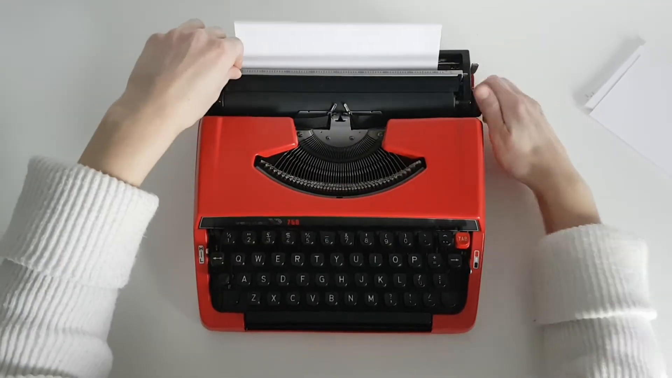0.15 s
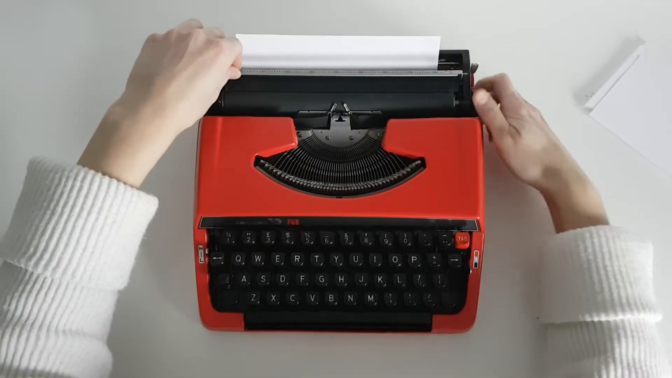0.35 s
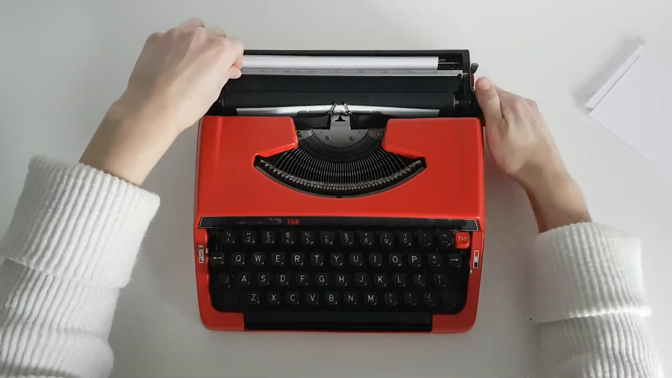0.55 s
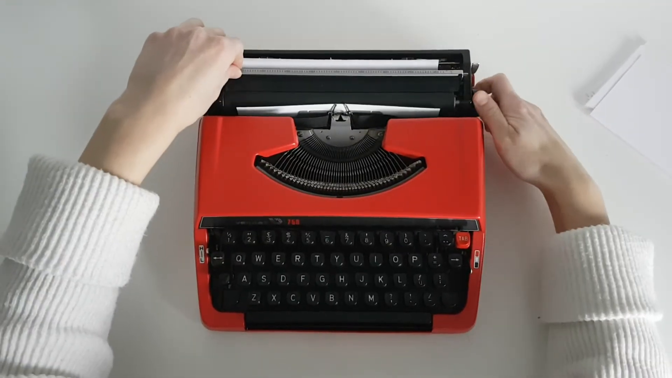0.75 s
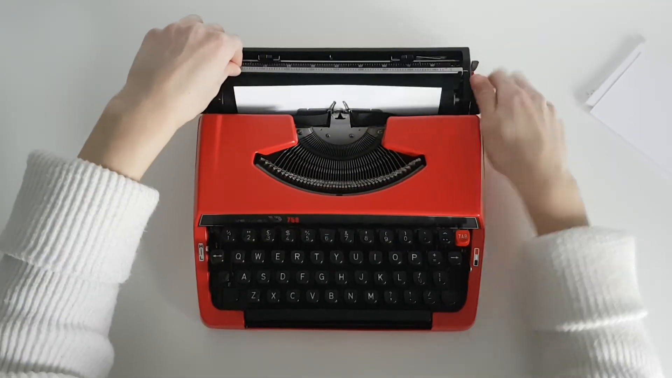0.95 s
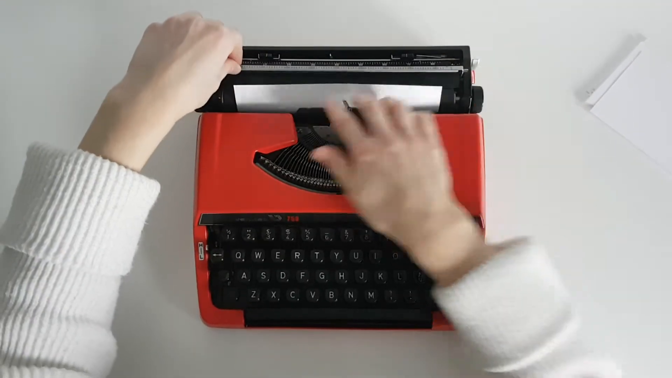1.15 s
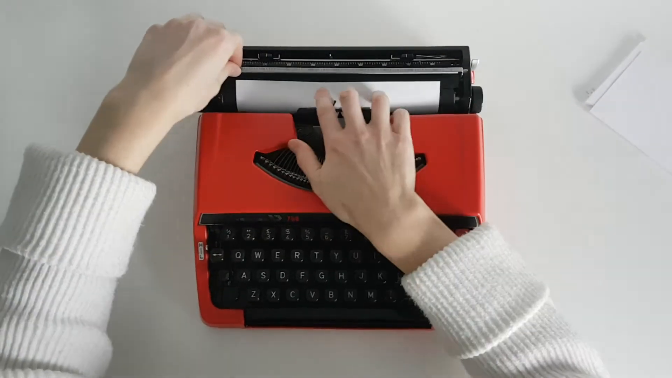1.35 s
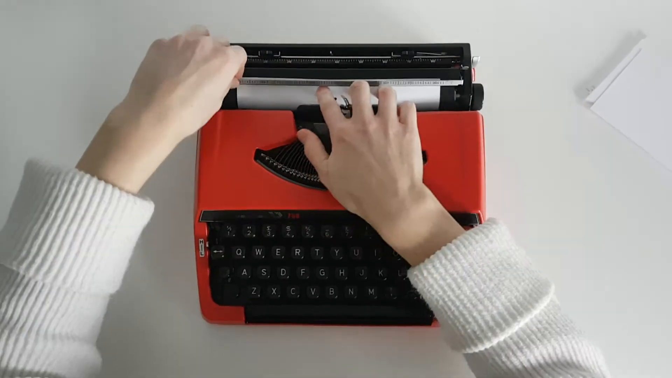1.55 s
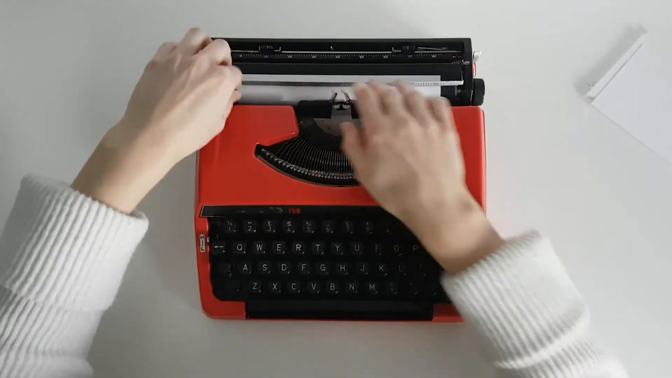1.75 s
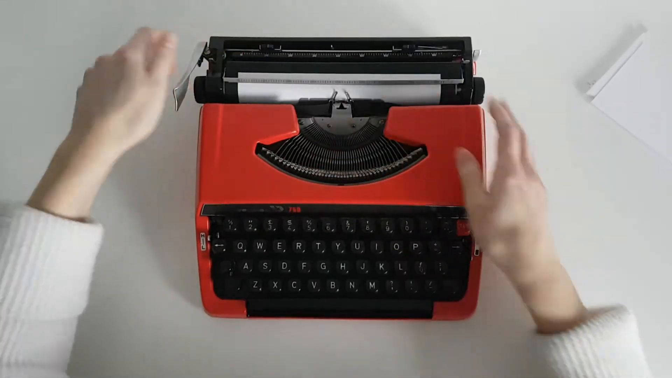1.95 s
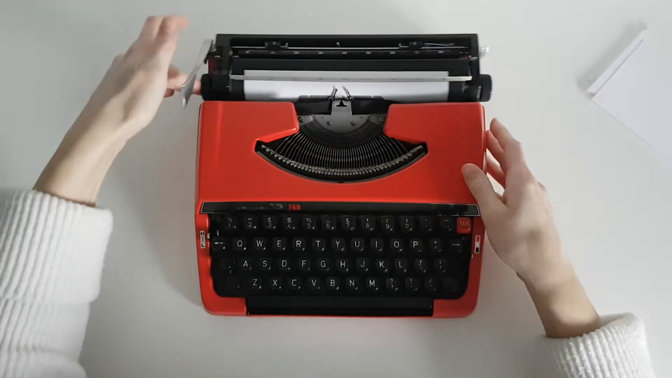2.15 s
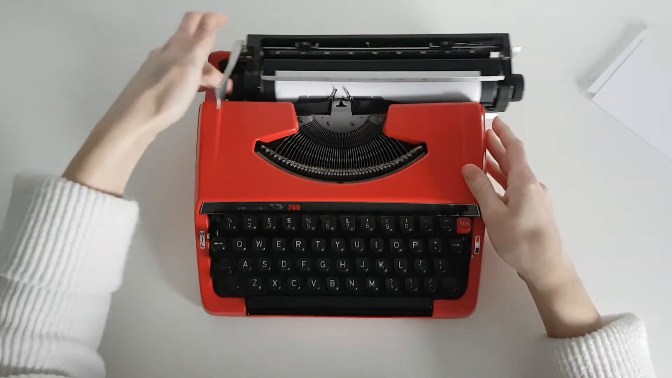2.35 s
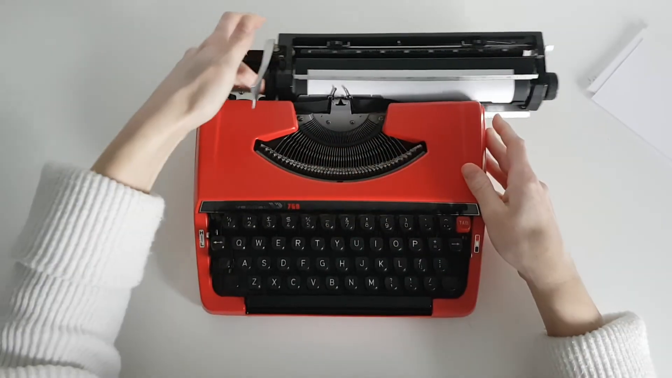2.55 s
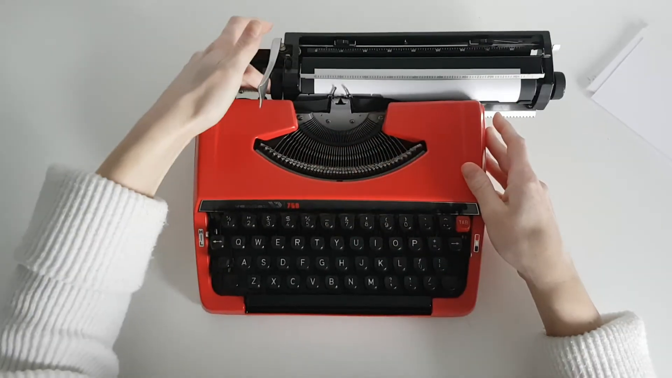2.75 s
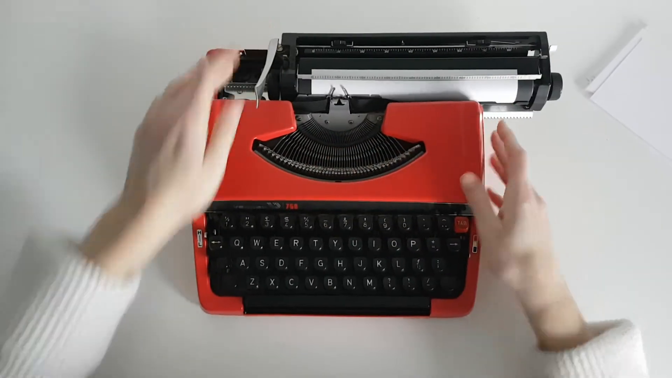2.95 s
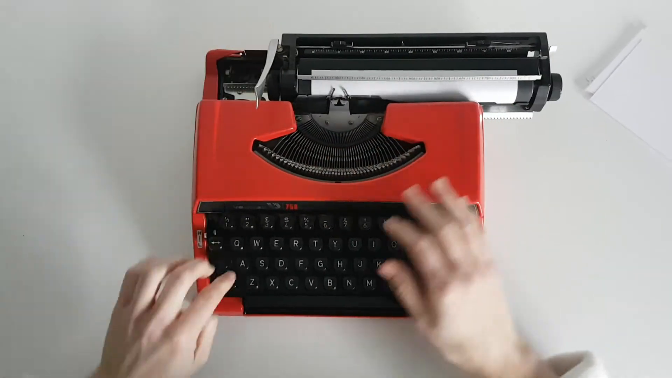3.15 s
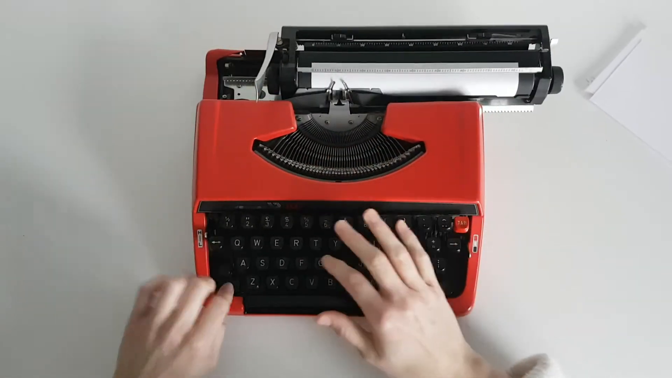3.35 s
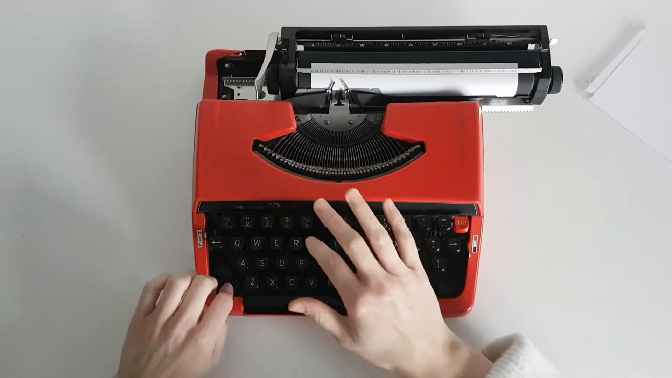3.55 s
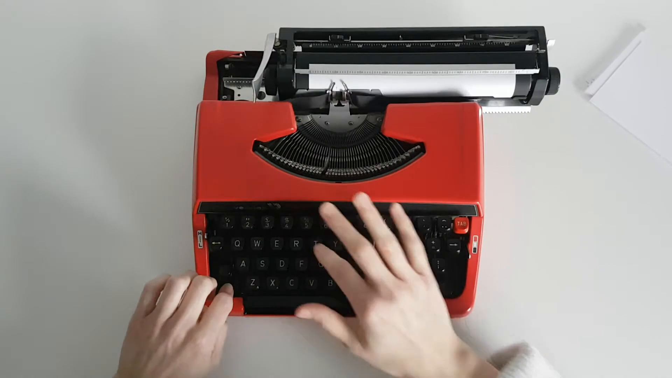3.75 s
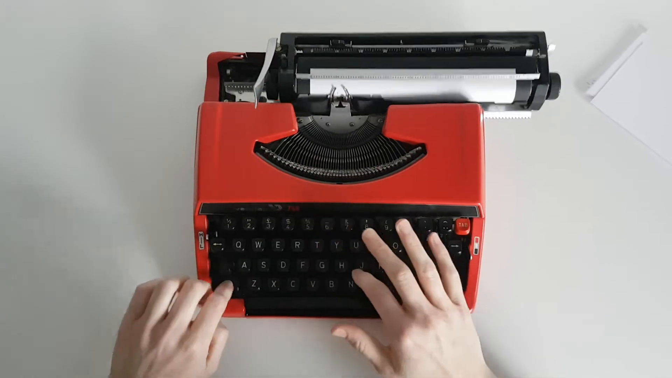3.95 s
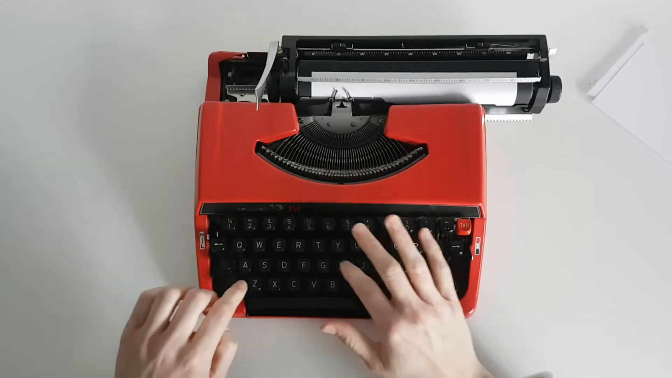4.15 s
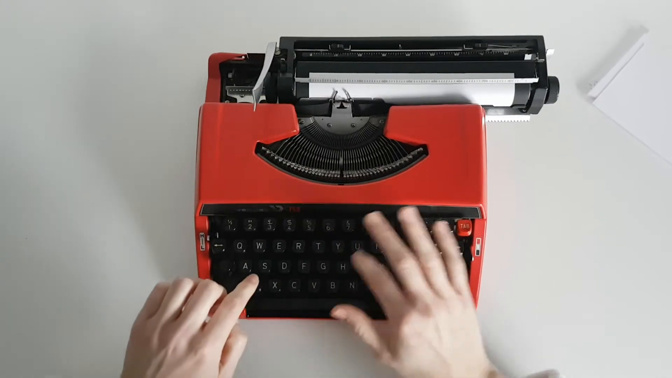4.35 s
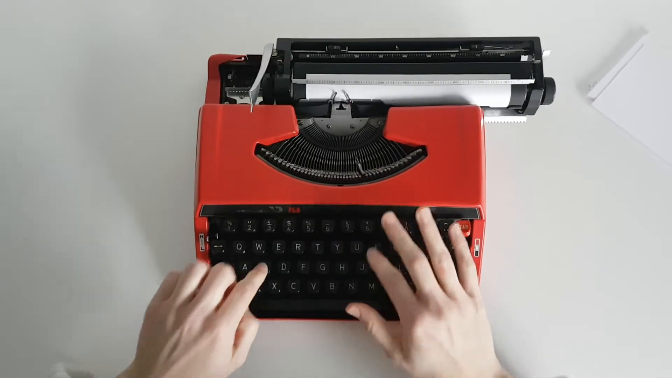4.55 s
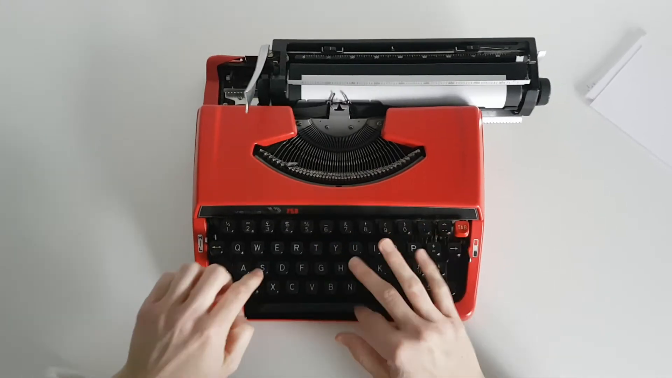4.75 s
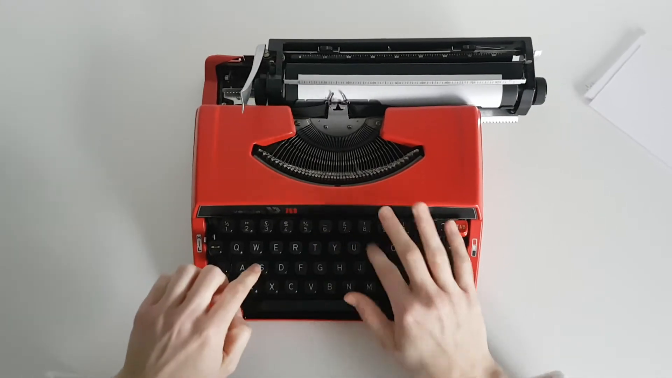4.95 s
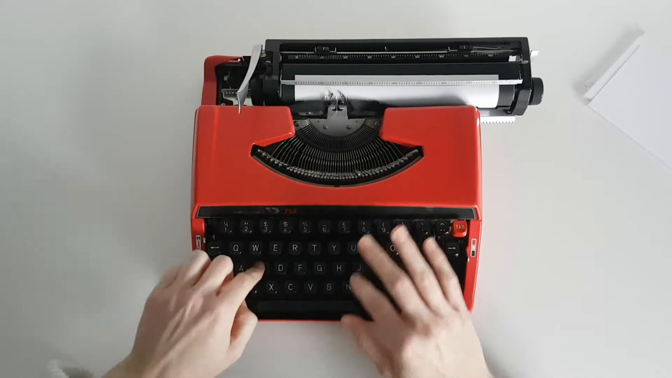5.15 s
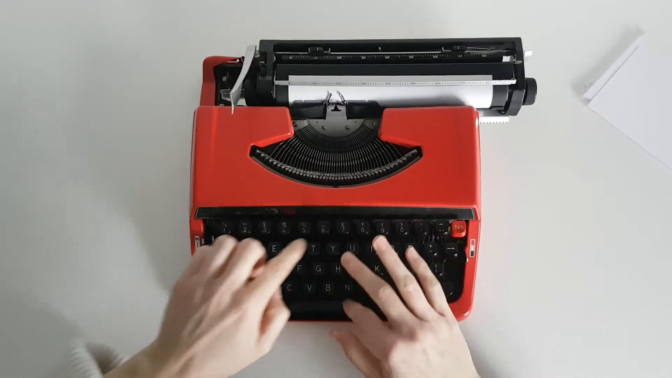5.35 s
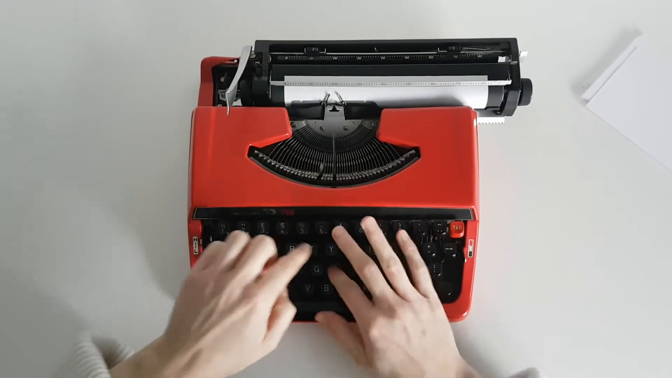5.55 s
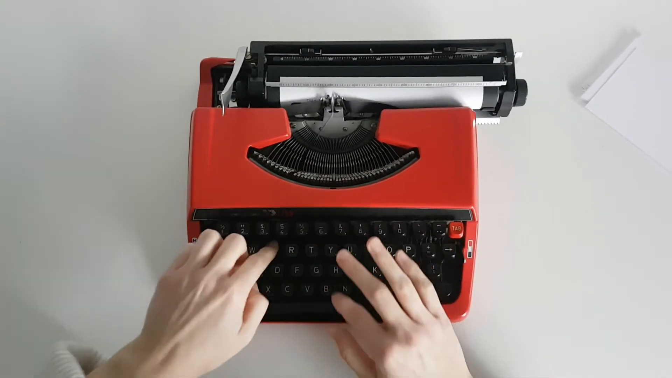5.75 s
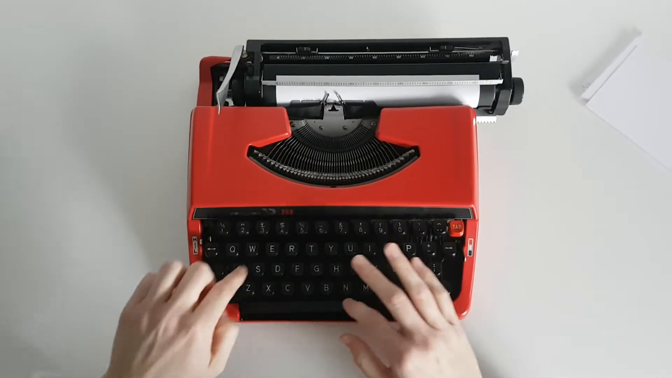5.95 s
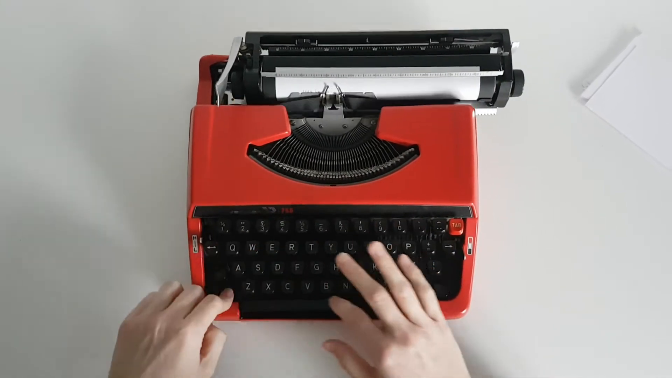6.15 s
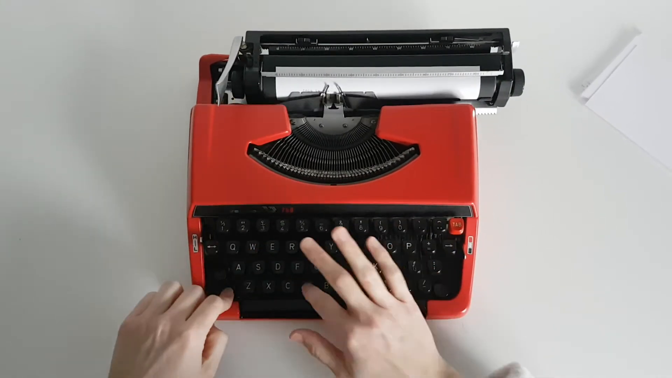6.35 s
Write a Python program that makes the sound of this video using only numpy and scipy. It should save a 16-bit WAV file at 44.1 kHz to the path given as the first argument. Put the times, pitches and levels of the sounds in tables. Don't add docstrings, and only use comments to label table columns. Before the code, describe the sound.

Close stereo microphones above a manual typewriter on a desk, in a quiet room with low hiss. From 0 to 1 second, four short bursts of dry ratchet chatter, at about 0, 0.15, 0.5 and 0.85, wind in scraping paper, with small clicks between. From 1 to 2 there are sparse, light finger and lever ticks and soft desk bumps. Around 2.15 to 2.65 the carriage rolls faintly with a thin whirr, ending in a sharp click; a short push follows near 2.9. At 3.4 a loud shift clack rings the cover and rocks to rest. Light key clatter and a carriage step follow at 3.7, then a double dropping thud at 4.0. Hard, bright typebar slaps land at 4.27, 4.49, 4.64, 5.02, 5.18, 5.48, 5.61 and 5.74, interleaved with metallic steps and falling-key rattle. Another shift clunks at 6.16; a final slap lands at 6.43.

```python
import sys
import numpy as np
from scipy import signal
from scipy.io import wavfile
from scipy.ndimage import uniform_filter1d

SR = 44100
rng = np.random.default_rng(int(sys.argv[2]) if len(sys.argv) > 2 else 0)


def output_pcm(signal):
    pcm = np.clip(np.atleast_2d(signal).T, -1, 1) * 32767
    wavfile.write(sys.argv[1], SR, np.round(pcm).astype(np.int16))


def undo_db(level):
    steps = np.asarray(level, float) / 20
    return 10 ** steps


N = 286209

# (f/Hz, level/dB per Hz)
AIR_TONE = [(15, -42), (25, -19), (43, -1), (195, -8), (560, -14.5), (1290, -16.5), (3080, -21.5),
            (3340, -17.5), (7920, -59), (13600, -29.5), (16000, -44)]
# (t/s, level/dB, t60/s)
HAND_JOLTS = [(0.0, -48, 0.38), (.15, -37.5, 0.86), (.505, -38.5, 1.06), (.85, -34, 0.48),
              (1.02, -54, 0.13), (1.23, -42.5, 0.37), (1.42, -54, 0.17), (1.53, -36.5, 0.25),
              (1.68, -42.5, 0.18), (2.06, -59, 3.5), (2.32, -50, 0.37), (2.4, -53, 0.22), (2.57, -54, 0.15),
              (2.65, -33, 0.3), (2.85, -39, 0.22), (3.27, -46, 0.34), (3.4, -52, 0.23), (3.56, -49, 0.4),
              (3.7, -53, 0.3), (4.15, -44, .6)]
# (f/Hz, level/dB per Hz)
RUMBLE_TONE = [(15, -82), (25, -109), (50, -22), (70, 7.5), (108, -7.5), (156, -6.5), (188, -2.5),
               (227, -7.5), (400, -17), (520, -22), (880, -120)]
# (start t/s, rise/s, hold/s, force level/dB, pawl spring ring level/dB)
KNOB_TURNS = [
    (-.1, 0.01, 0.07, -42, 12),
    (0.149, 0.021, 0.09, -33, -8.5),
    (0.513, 0.011, 0.093, -35.5, 1),
    (0.842, 0.0042, 0.063, -35.5, 0),
]
# (f/Hz, width/Hz, level/dB)
PLATEN = [(575, 90, -7), (790, 110, -7), (1088, 150, 3.5), (2320, 350, -4), (5300, 600, -10),
          (7570, 900, -8)]
PAWL_SPRING = [(3760, 230, 0)]
# (f/Hz, level/dB per Hz)
PAPER_TONE = [(290, -35), (500, -2), (773, 5), (868, -15), (1090, -20), (1690, -32), (3700, -2),
              (8830, -10), (13100, -9.5), (16000, -12)]
# (t/s, click level/dB, ring of the part f/Hz, ring level/dB, rattle t60/s)
DULL_TOUCHES = [(0.076, -39.5, 1440, -73, 0.035), (0.2841, -29, 3860, -29, 0.035),
                (0.331, -36.5, 1140, -71, 0.11), (.493, -33.5, 3080, -64, 0.095),
                (0.69, -38, 1050, -68, 0.072), (.8195, -34, 2920, -42.5, 0.063),
                (1.020, -32.5, 2330, -52, 0.1), (1.267, -43, 875, -69, 0.35),
                (1.2997, -50, 567, -47.5, 0.059), (1.9413, -53, 3300, -53.5, 0.34),
                (2.6679, -22, 720, -38.5, 0.16), (2.834, -38.5, 576, -63, 0.27),
                (2.9494, -36, 1870, -52, 0.26), (3.345, -39.5, 1490, -46.5, 0.35),
                (3.3682, -27.5, 1316, -59, 0.15), (6.13, -35, 1310, -53, 0.1)]
CRISP_TOUCHES = [(.4158, -48, 12050, -43.5, 0.011), (1.0689, -85, 1070, -66, 0.059),
                 (1.2334, -39, 690, -47, 0.22), (1.388, -46, 8500, -51.5, 0.081),
                 (1.43, -55, 9100, -61, 0.15), (1.632, -44.5, 11000, -59, 0.28),
                 (1.535, -37, 620, -57, 0.11), (1.5483, -31, 2250, -39, 0.022),
                 (1.5633, -28, 1620, -31.5, 0.039), (1.685, -39.5, 2180, -41, 0.059),
                 (2.1332, -47, 3120, -40.5, 0.041), (2.652, -17, 3530, -70, 0.048),
                 (2.8596, -28, 4170, -73, 0.12), (2.868, -59, 4000, -32.5, 0.027),
                 (3.1467, -54, 1420, -56, 0.14), (3.09, -60, 610, -52, 0.046), (3.285, -70, 666, -53, 0.06),
                 (6.0828, -30, 1040, -47, 0.091)]
# (t/s, level/dB)
SLIDES = [
    [(2.138, -58.5), (2.2, -64.5), (2.424, -57), (2.56, -59.5), (2.645, -64.5)],
    [(2.885, -62), (2.963, -60), (3.04, -86)],
]
# (f/Hz, width/Hz, level/dB)
RAIL = [(743, 33, 5), (990, 20, 10), (1310, 88, -2), (1970, 99, 1), (2290, 130, 1), (4360, 93, -14)]
SPRING_DRUM = [(2864, 38, 11.5), (3210, 470, 1.5)]

# (t/s, steel click level/dB, treble over click level/dB, ring level/dB)
LATCHES = [
    (3.3928, -19.5, -7.5, -18.5),
    (6.1588, -14, -8.5, -25),
]
SHIFTS = [
    (3.4025, -17, -7, -10),
    (6.1666, -16, -6, -8),
]
SETTLES = [
    (3.4375, -32, -5, -21),
    (3.468, -36, -15, -24),
    (6.207, -34, -3, -17.5),
    (6.234, -39, -11, -23.5),
]
PRESSES = [
    (3.6665, -28.5, -1.5, -45),
    (4.2351, -29, -0.2, -48),
    (4.4547, -32, 5, -51),
    (4.9833, -27.5, 2.2, -41.5),
    (5.4444, -27.5, -1.5, -43),
    (6.3946, -23, -1.5, -35),
]
LINK_KNOCKS = [(3.7021, -18, -3.5, -29.5), (3.7485, -25, -2.5, -29.5), (3.8342, -44, -29, -33.5),
               (4.4234, -26.5, -28, -37), (4.6093, -20, 0.2, -27.5), (4.7547, -18, -11, -24.5),
               (4.7938, -30, -13, -26.5), (4.8571, -16, -7.5, -21), (5.1476, -19, 1.9, -29.5),
               (5.2882, -19, -10.5, -20), (5.3722, -18.5, -4.5, -21.5), (5.883, -25.5, -10, -25),
               (5.9433, -16.5, -8, -21.5)]
ESCAPES = [
    (3.772, -14.5, -12, -14.5),
    (4.361, -8, -10.5, -15),
    (4.574, -10.5, -10.5, -16),
    (5.1095, -13, -7.5, -20.5),
    (5.567, -12.5, -9.5, -15),
    (5.697, -8.5, -10, -16.5),
    (5.8384, -18.5, -5, -21.5),
]
DROPS = [
    (4.0004, -16, -6, -19),
    (4.0154, -17.5, -5.5, -22),
]
SLAPS = [
    (4.2725, -5, -2.5, -28.5),
    (4.4947, -5, -3, -28.5),
    (4.6449, -4, -3, -22.5),
    (5.021, -5, -7, -27.5),
    (5.1848, -3.5, -5.5, -25),
    (5.4828, -4.5, -6.5, -24.5),
    (5.6073, -4, -5.5, -23.5),
    (5.7439, -5.5, -3.5, -26),
    (6.4315, -3, -6, -30),
]

# (f/Hz, level/dB per Hz)
SLAP_TONE = [(760, -38), (1300, 2.5), (1530, 1), (1680, -2), (2100, 1.5), (2620, -3), (2840, -5),
             (3440, 0.5), (8000, -22), (10400, -46.5), (17600, -120)]
ESCAPE_TONE = [(530, -31.5), (900, -2), (1090, -22), (1300, -2.5), (2110, -8), (2350, -3), (3750, -15.5),
               (4100, -28.5), (8000, -45.5), (10400, -53.5), (17600, -120)]
LINK_TONE = [(530, 0), (900, -4), (1030, -2), (1420, -5), (1740, -8), (2420, -4.5), (2650, -5), (4710, -14),
             (8000, -29), (10400, -38.5), (17600, -120)]
TREBLE_TONE = [(3240, -18), (5500, -9), (6020, -10.5), (6890, -6.5), (8160, -8), (9130, -14.5),
               (13000, -11), (15100, -11.5), (15500, -19.5)]
# (f/Hz, level/dB, t60/s)
STEEL = [(1535, 14, 0.019), (1878, 6.5, 0.15), (2440, -8, 0.085), (2940, -10, 0.037), (3390, 25, 0.0041),
         (3750, 9, 0.019), (3890, 10.5, 0.014), (4350, -57, 0.029)]
FRAME = [(444, -2.5, 0.19), (576, 0, 0.61), (690, -43, 0.13), (731, -2, 0.83), (768, -4, 0.097),
         (957, -17, 0.063), (1020, 3, 0.12), (1130, -31, .04), (1427, -22, 0.21)]
LATCH = [(1300, -13, 0.031), (1390, 19, 0.043)]
COVER_TOP = [(237, -9, .3), (262, -13, .2), (431, -12, .25), (560, 5, .3), (657, -15, .15), (721, -11, .2),
             (786, -14, .2), (985, -12, .15), (1240, -17, .3)]
COVER_LOW = [(191, -5, 0.054), (233.5, -12.5, 0.2), (444, -2, 0.15), (540, 4.5, 0.21), (810, 1, 0.12),
             (1050, 1, 0.098), (1210, -26, 0.092)]
COVER_SIDE = [(415, -15, .3), (554, -5, .25), (690, -7, .25), (781, -8, .15), (985, -5, .15),
              (1070, 7, .22), (1200, -6, .12), (1710, -6, .06), (2680, -7, .05)]
DESK = [(72.5, -8.5, 0.41), (85.6, -0.5, 0.13), (108.8, 1, 0.14), (157.2, 4.5, 0.088), (177.8, -27, 0.4),
        (235.1, -1.5, 0.29), (282.5, -16.5, 0.47)]

# (f/Hz, t60/s)
ROOM_DECAY = [(100, 0.29), (500, 0.76), (2000, 0.29), (6000, 0.3), (14000, 0.19)]
# (f/Hz, level/dB)
ROOM_TONE = [(100, -2), (560, -12), (1000, -6), (1700, -3), (4000, 0), (14000, 0)]
# (f/Hz, side minus mid level/dB)
WIDTH = [(60, -21), (150, -20), (380, -14), (700, -11), (1200, -5), (2400, -4), (6000, 0), (15000, 0)]


def evened(x):
    return x / np.sqrt(np.mean(x ** 2) + 1e-20)


def peaked(x):
    return x / (abs(x).max() + 1e-20)


def smoothed(x, size):
    return uniform_filter1d(uniform_filter1d(x, size), size)


def read(points, hz):
    f, value = np.transpose(points)
    return np.interp(np.log(hz + 1), np.log(f + 1), value)


def curve(rows):
    s, db = np.transpose(rows)
    return undo_db(np.interp(np.arange(N) / SR, s, db, -140, -140))


def colour(x, tone):
    hz = abs(np.fft.fftfreq(8192, 1 / SR)) + 1
    db = read(tone, hz) - 24 * np.maximum(np.log2(tone[0][0] / hz), 0)
    log_gain = np.log(undo_db(np.maximum(db, -80)))
    spectrum = np.exp(np.conj(signal.hilbert(log_gain)))
    taps = np.fft.ifft(spectrum).real[:4096]
    return signal.oaconvolve(x, taps)[:len(x)]


def resonate(x, peaks):
    out = 0
    for k, (hz, width, db) in enumerate(peaks):
        out = out + (-1) ** k * undo_db(db) * signal.lfilter(*signal.iirpeak(hz, hz / width, SR), x)
    return out


def grains(length, per_s, spread_db):
    chance, rarity, sign = rng.random((length, 3)).T
    size = undo_db(-spread_db * np.log(rarity * .98 + .02)) * np.sign(sign - .5)
    return size * (chance < per_s / SR)


def clumps(length, size, depth_db):
    return undo_db(depth_db * evened(smoothed(rng.standard_normal(length), size)))


def swells(rows, rise_s):
    s, db, t60 = np.transpose(rows)[:, :, None]
    coarse = np.arange(0, N, 32)
    t = np.maximum(coarse / SR - s, 0)
    each = undo_db(db - 60 * t / t60) * (1 - np.exp(-t / rise_s))
    return np.interp(np.arange(N), coarse, np.sqrt((each ** 2).sum(0)))


def after_keys(over_db, t60, rise_s):
    return swells([(row[0], row[1] + over_db, t60) for row in SLAPS + ESCAPES], rise_s)


def rolling():
    return sum(curve(rows) for rows in SLIDES)


def spread(x):
    path = rng.standard_normal(512) * np.exp(-np.arange(512) / 130)
    return np.array([x, signal.oaconvolve(x, path / np.linalg.norm(path))[:len(x)]])


def contact(t, t60, crack, crack_s, bounce, rise_s, hard=1.8):
    bounce_s, share = bounce
    rattle = undo_db(-60 * t / t60) * (1 - np.exp(-t / rise_s)) * clumps(len(t), size=110, depth_db=-0.5)
    later = t - bounce_s
    crunch = np.exp(-t / crack_s) + share * (later >= 0) * np.exp(-abs(later) / crack_s)
    force = evened(grains(len(t), 9000, 5.53)) * rattle + crack * crunch * rng.standard_normal(len(t))
    force[[0, round(bounce_s * SR)]] = hard * crack, hard * crack * share
    return force


def ring(modes, t, scatter_db):
    hz, db, t60 = np.transpose(modes)[:, :, None]
    level_luck, pitch_luck = rng.standard_normal((2, len(modes), 1))
    knots = rng.standard_normal((len(modes), 40))
    wander = np.array([np.interp(t / .011, np.arange(40), row) for row in knots])
    firm = np.exp(-(t / .03) ** 4)
    tone = np.sin(2 * np.pi * hz * (1 + .006 * pitch_luck) * t)
    decay = undo_db(db + scatter_db * level_luck - 60 * t / t60)
    return (decay * (firm + (1 - firm) * wander) * tone).sum(0)


def shell_ring(modes, t, push_s):
    push = np.exp(-t[:4000] / push_s) * rng.standard_normal(4000)
    push[0] = 5 * np.linalg.norm(push) * np.exp(-push_s / .01)
    settle_s, settled = .029, .12
    damping = settled + (1 - settled) * np.exp(-(t / settle_s) ** 4)
    loose = clumps(len(t), size=200, depth_db=1.2) * damping
    return peaked(loose * signal.oaconvolve(ring(modes, t, 2.), push)[:len(t)])


def blows(table, tone, shell_modes, force, steel_db, push_s, desk_db):
    out, t = np.zeros((2, N + SR)), np.arange(13000) / SR
    for s, click_db, treble_db, shell_db in table:
        drive = contact(t, *force)
        steel = signal.oaconvolve(drive, ring(STEEL, t[:4000], 2.2))[:len(t)]
        click = peaked(evened(colour(drive, tone)) + undo_db(steel_db) * evened(steel))
        treble = peaked(colour(drive * undo_db(-120. * t), TREBLE_TONE))
        shell = shell_ring(shell_modes, t, push_s)
        thump = peaked(ring(DESK, t, 1.5) * (1 - np.exp(-t / .003)))
        sound = undo_db(click_db) * (click + undo_db(treble_db) * treble)
        sound = sound + undo_db(shell_db) * (shell + undo_db(desk_db) * thump)
        at = round(s * SR)
        out[:, at:at + len(t)] += spread(sound)
    return out[:, :N]


def air():
    return undo_db(-65) * np.array([evened(colour(rng.standard_normal(N), AIR_TONE)) for _ in range(2)])


def handling():
    rumble = colour(rng.standard_normal(N), RUMBLE_TONE)
    rumble = rumble / np.sqrt(smoothed(rumble ** 2, 1600) + 1e-12)
    shake = swells(HAND_JOLTS, rise_s=0.026) + after_keys(-33.5, t60=1, rise_s=0.019)
    shake = shake + undo_db(-77) + undo_db(-3) * rolling()
    buzz = grains(N, 5000, 2.7) * clumps(N, size=150, depth_db=5.0)
    parts = evened(colour(buzz, LINK_TONE)) + undo_db(-10.0) * evened(colour(buzz, TREBLE_TONE))
    buzzing = after_keys(-23, t60=0.39, rise_s=0.055) + undo_db(-74.5)
    return spread(rumble * shake * clumps(N, size=900, depth_db=2.0) + evened(parts) * buzzing)


def knob():
    t = np.arange(round(1.05 * SR)) / SR
    teeth_per_s = 120 * (1 + 4.0 * uniform_filter1d(rng.standard_normal(len(t)), size=200))
    teeth = np.cumsum(teeth_per_s) / SR
    gate = .28 + np.exp(-(teeth % 1) / .22)
    chatter = gate * evened(grains(len(t), 16000, 3.8))
    body = evened(resonate(chatter, PLATEN)) + undo_db(1.2) * evened(colour(chatter, PAPER_TONE))
    body = evened(body) * undo_db(1.0)
    spring = evened(resonate(chatter * gate, PAWL_SPRING))
    grip_db, sag_db_per_s, let_go_db_per_s, spring_db_per_s = -13.5, -66, -600, -140
    sound = 0
    for start, rise, hold, force_db, spring_db in KNOB_TURNS:
        since = np.maximum(t - start, 0)
        db = force_db + grip_db * np.maximum(1 - since / rise, 0) + sag_db_per_s * since
        db = db + let_go_db_per_s * np.maximum(since - rise - hold, 0)
        sound = sound + (t > start) * undo_db(db) * (body + spring * undo_db(spring_db + spring_db_per_s * since))
    return spread(np.pad(sound, (0, N - len(t))))


def touches():
    out, t = np.zeros((2, N)), np.arange(6500) / SR
    for table, treble_db in (DULL_TOUCHES, -26), (CRISP_TOUCHES, -11):
        for s, click_db, part_hz, part_db, t60 in table:
            drive = contact(t, t60, crack=0.46, crack_s=0.004, bounce=(.005, .6), rise_s=0.00045)
            sound = undo_db(click_db - 8.0) * peaked(colour(drive, LINK_TONE))
            sound = sound + undo_db(click_db + treble_db) * peaked(colour(drive, TREBLE_TONE))
            sound = sound + undo_db(part_db) * peaked(resonate(drive, [(part_hz, part_hz / 3, 0)]))
            at = round(s * SR)
            out[:, at:at + len(t)] += spread(sound)
    return out


def carriage():
    ticks = evened(grains(N, 1500, 8.0)) + 1.5 * rng.standard_normal(N)
    rail = evened(resonate(ticks * clumps(N, size=300, depth_db=3.0), RAIL))
    rail = evened(rail + undo_db(-2.5) * evened(colour(ticks, LINK_TONE)))
    drum = evened(resonate(ticks * clumps(N, size=60, depth_db=3.5), SPRING_DRUM))
    speed = rolling()
    full_db = -58
    return spread(speed * (rail * undo_db(-1.0) + drum * speed * undo_db(-3.5 - full_db)))


def latches():
    return blows(LATCHES, LINK_TONE, LATCH, (.17, .9, .002, (.004, .7), .002), -4, 0.0047, desk_db=-12)


def shifts():
    return blows(SHIFTS, LINK_TONE, COVER_TOP, (.25, .8, .002, (.0036, 5.), .002, 3.), -37, 0.0011, desk_db=-9)


def settles():
    return blows(SETTLES, LINK_TONE, COVER_LOW, (.15, .8, .002, (.006, .8), .002), -30, 0.002, desk_db=-6.5)


def presses():
    return blows(PRESSES, LINK_TONE, FRAME, (.7, .6, .002, (.006, .8), .004), -18.0, 0.097, desk_db=5.5)


def link_knocks():
    return blows(LINK_KNOCKS, LINK_TONE, FRAME, (.19, .6, .002, (.006, .8), .005), -6.5, 0.51, desk_db=-5)


def escapement():
    force = (.22, 2.4, .003, (.0025, 1.2), .002)
    return blows(ESCAPES, ESCAPE_TONE, COVER_SIDE, force, -15.0, 0.0042, desk_db=-19.5)


def drops():
    return blows(DROPS, LINK_TONE, COVER_TOP, (.3, .8, .002, (.006, .8), .002), -68, 0.0013, desk_db=5)


def swings():
    t = np.arange(0, N, 32) / SR
    gain = sum(undo_db(row[1] - 32) * (t < row[0]) * np.exp(np.minimum(t - row[0], 0) / .012) for row in SLAPS)
    scrape = grains(N, 6000, 5.0)
    scrape = evened(colour(scrape, SLAP_TONE)) + undo_db(-5.5) * evened(colour(scrape, TREBLE_TONE))
    return spread(scrape * np.interp(np.arange(N), t * SR, gain))


def slaps():
    return blows(SLAPS, SLAP_TONE, FRAME, (.16, 2.6, .0011, (.0054, .6), .003, 8.), -4.0, 0.059, desk_db=-10)


def room(x):
    taps = np.zeros((6, SR // 2))
    at = np.arange(200, SR // 2 - 20, 20) + rng.integers(0, 20, (6, (SR // 2 - 201) // 20))
    np.put_along_axis(taps, at, rng.choice([-1., 1.], at.shape), 1)
    hz, t, z = signal.stft(taps, SR, nperseg=256)
    decay = undo_db(-60 * t / read(ROOM_DECAY, hz)[:, None])
    tail = signal.istft(z * decay, SR, nperseg=256)[1]
    paths_per_s = 23
    turn = np.pi * (paths_per_s * np.arange(N) / SR + np.arange(3)[:, None] / 3)
    feeds = np.sqrt(2 / 3) * np.sin(turn) * colour(x, ROOM_TONE)
    wet = signal.fftconvolve(np.tile(feeds, (2, 1)), tail / np.linalg.norm(tail[0]), axes=1)[:, :N]
    return wet.reshape(2, 3, N).sum(1)


def scene():
    loading = handling() + knob() + touches() + carriage()
    shifting = latches() + shifts() + settles() + drops()
    typing = presses() + link_knocks() + escapement() + swings() + slaps()
    machine = loading + shifting + typing
    mid, side = machine + undo_db(-5.5) * room(machine[0]) + air()
    side = undo_db(.4) * colour(side, WIDTH)
    left_lag = -2
    return np.array([np.roll(mid + side, left_lag), mid - side])


def top_cut(x):
    return signal.sosfilt(signal.butter(12, 16830, fs=SR, output="sos"), x)


def record(dry):
    dry = signal.sosfilt(signal.butter(2, 42, "high", fs=SR, output="sos"), dry)
    sheen = signal.sosfilt(signal.butter(2, 10500, "high", fs=SR, output="sos"), dry)
    dry = dry + sheen * np.array([[.22], [-.22]])
    edge = signal.firwin(511, 15700, window=("kaiser", 5), fs=SR)
    return top_cut(signal.oaconvolve(dry, edge[None], "same"))


dry = scene()
out = record(dry)
output_pcm(out)
```